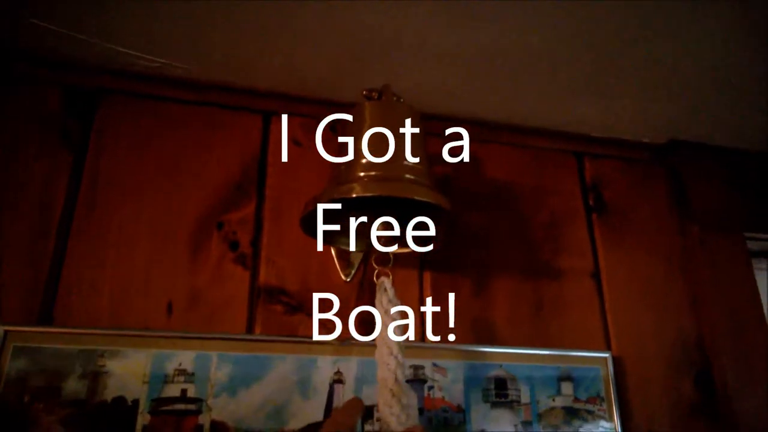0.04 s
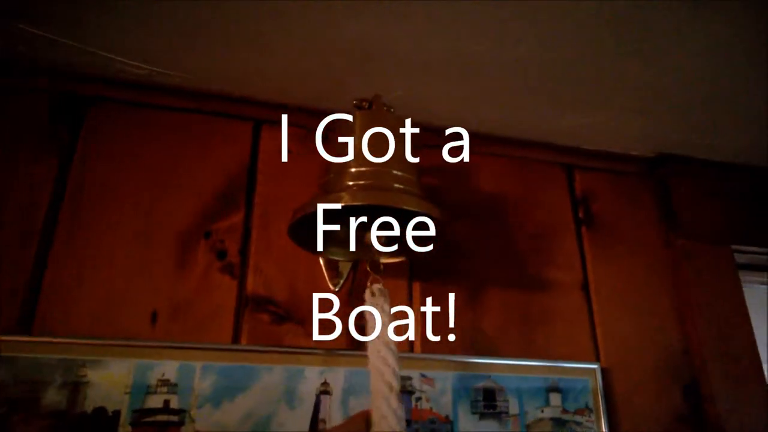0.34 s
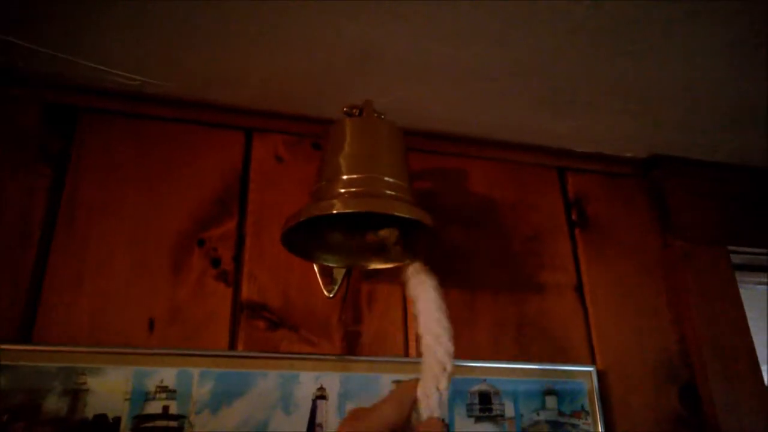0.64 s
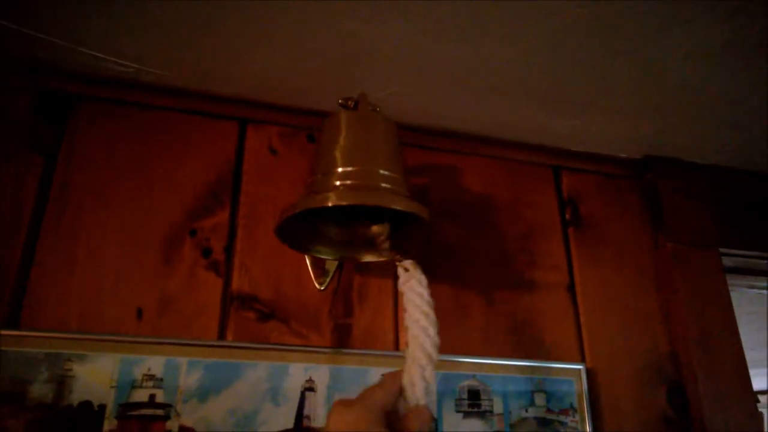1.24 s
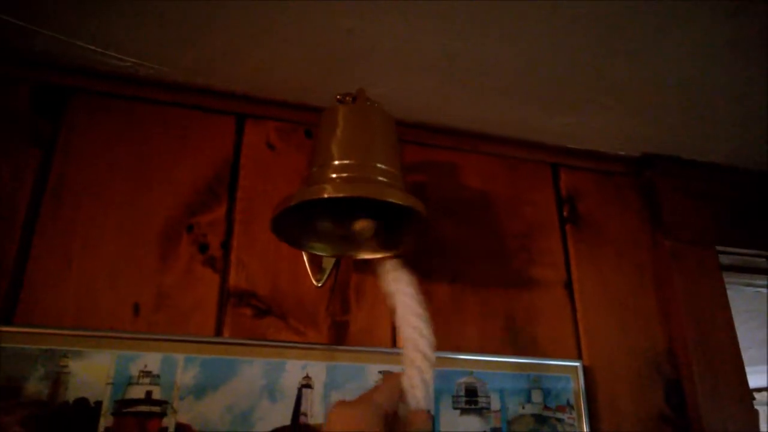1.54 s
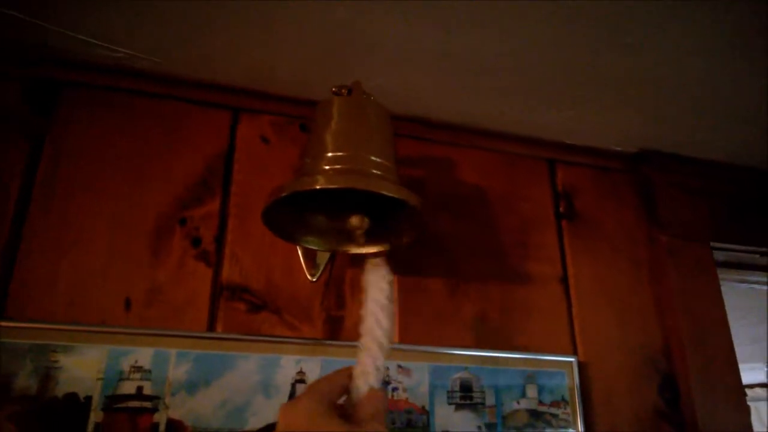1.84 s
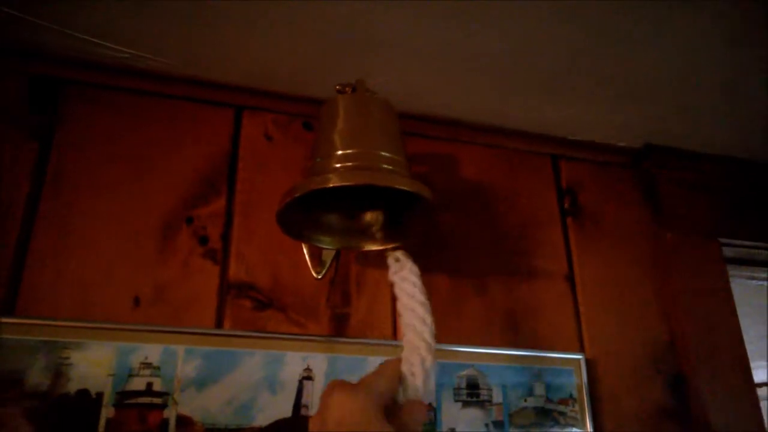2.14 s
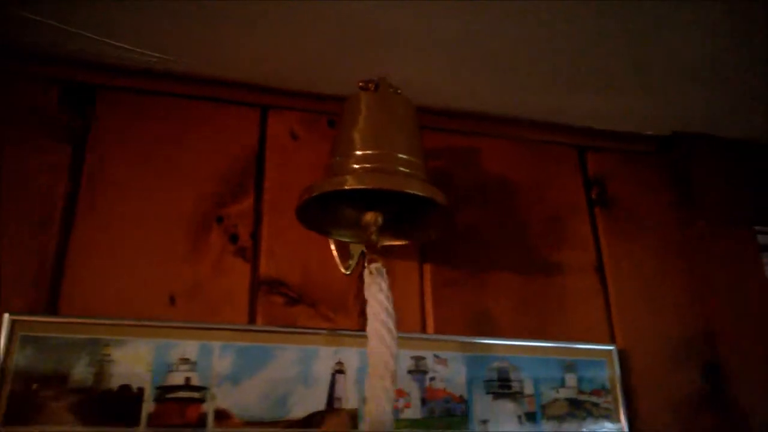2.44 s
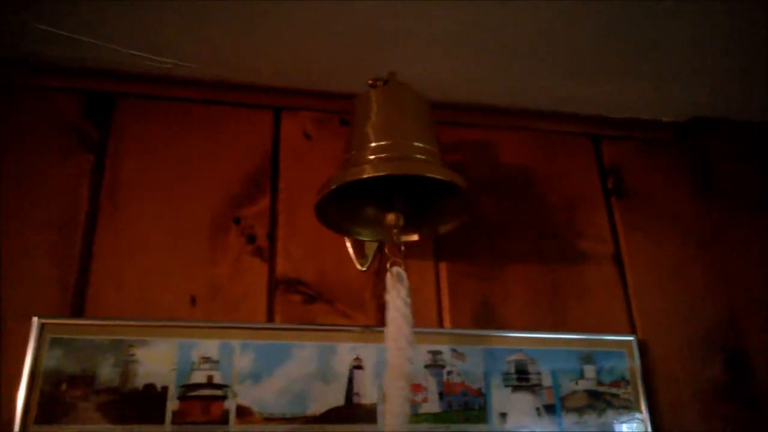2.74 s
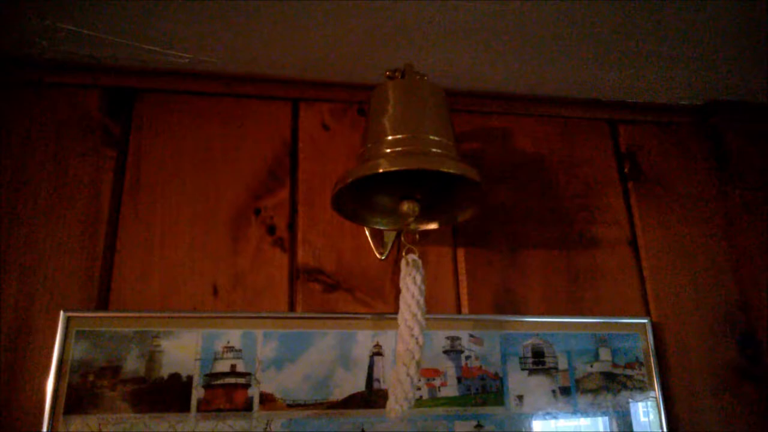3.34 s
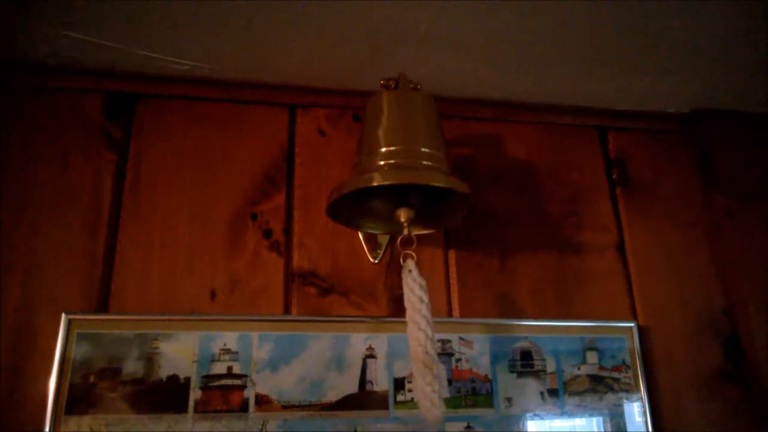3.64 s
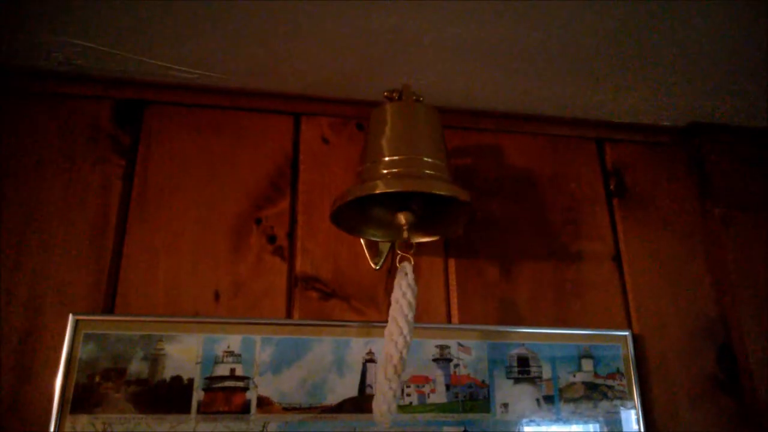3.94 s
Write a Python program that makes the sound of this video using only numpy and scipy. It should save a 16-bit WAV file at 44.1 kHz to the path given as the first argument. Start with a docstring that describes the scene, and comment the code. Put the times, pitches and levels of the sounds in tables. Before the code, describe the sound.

A small brass bell is struck four times with its rope and rings out.

```python
"""Brass bell in a quiet room

A small bell on a wooden wall, struck four times by its roped clapper, rings out on a stereo pair, its
partials beating in close pairs. Between blows the clapper's eye scrapes and the rope knocks. At the end
come a dry tick as the sound skips, a bump on the camera and another tick. The limiter ducks just ahead
of each blow and holds the ringing level until it has faded. Underneath lie a low rush and mains hum."""
import sys
import numpy as np
from scipy import signal
from scipy.fft import rfft, irfft
from scipy.io import wavfile
from scipy.ndimage import uniform_filter1d, minimum_filter1d

SR = 44100
rng = np.random.default_rng(int(sys.argv[2]) if len(sys.argv) > 2 else 0)


def materialize(psi):
    """Save the field psi as 16-bit PCM at rate SR to the path in sys.argv[1].

    A 1-D psi becomes a single channel; in a 2-D psi each row is a channel.
    """
    bounded = np.clip(np.atleast_2d(psi).T, -1, 1)
    quanta = np.round(bounded * 32767).astype(np.int16)
    wavfile.write(sys.argv[1], SR, quanta)


N = 176400
T = np.arange(N) / SR

# The clapper's blows. Each row: start in seconds, strength in dB, extra dB for the upper mode of the
# first (hum note), second and sixth pair, treble lift in dB, treble tilt in dB per octave.
BLOWS = [(0.6918, 12.5, 8, 4, 3.5, 0.5, -2.5), (1.1731, 0.5, 13, 8.5, 2, 3, -6.5),
         (1.612, 2, 11.5, -6, 4.5, 2.5, -0.5), (2.081, -3, 1.5, 2.5, -3, 5.5, -7)]


def from_db(db):
    """Decibels to gain."""
    return 10 ** (np.asarray(db) / 20)


def rms_one(x):
    """Scale to rms 1."""
    return x / np.sqrt(np.mean(x ** 2) + 1e-20)


def pan(db):
    """Left and right gains of constant power, the left louder by db."""
    return rms_one(from_db(np.array([[db], [-db]]) / 2))


def fade(age, t60):
    """Exponential decay, 60 dB down after t60 seconds, silent before age 0."""
    return (age >= 0) * np.exp(-np.log(1000) * np.clip(age / t60, 0, 4))


def decays(events, t60):
    """One decay per event, summed; each row begins with start in seconds and level in dB."""
    return sum(from_db(db) * fade(T - start, t60) for start, db, *_ in events)


def noise(spectrum, likeness=0.35):
    """Coloured stereo noise of rms 1; likeness is the correlation of left and right."""
    hz, db = np.transpose(spectrum)
    gain = from_db(np.interp(np.log(np.fft.rfftfreq(N, 1 / SR) + 1), np.log(hz), db))
    mid, side = irfft(rfft(rng.standard_normal((2, N))) * gain, N)
    return rms_one(np.sqrt(1 + likeness) * mid + np.sqrt(1 - likeness) * side * [[1], [-1]])


def resonate(x, hz, width_hz):
    """A two-pole resonance of peak gain 1."""
    r = np.exp(-np.pi * width_hz / SR)
    feedback = [1, -2 * r * np.cos(2 * np.pi * hz / SR), r * r]
    return signal.lfilter(np.array([1, 0, -1]) * (1 - r * r) / 2, feedback, x + 1e-18)


def mode(age, hz, pan_db, lead_rad):
    """One mode of the bell at the two microphones, the left ahead in phase by lead_rad."""
    angle = 2 * np.pi * (hz * age % 1) + np.array([[1], [-1]]) * lead_rad / 2
    return pan(pan_db) * np.sin(angle)


def bell():
    """Each blow sets all the modes of the brass going afresh; close neighbours beat as they die away."""
    # The strong pairs of modes. Each row: lower and upper frequency in Hz.
    pair_hz = [(889.5, 893.3), (2246.4, 2260.2), (2527.9, 2538.3), (2688.2, 2697.3), (3043.6, 3049.9),
               (4327, 4331), (5281.2, 5295)]
    # How those pairs ring. Each row: t60 in seconds, first swell in beat periods, then for lower and
    # upper mode in turn: levels in dB, left over right in dB, left leads in radians.
    pair_rings = [(26.3, 0.048, -30.5, -29.5, 8.5, -3.5, 3, 0.26),
                  (7.1, 0.59, -19.5, -21, 2, 3.5, 0.92, 1.74), (3.8, 1, -24, -19.5, 8.5, 10, -1.04, 4.5),
                  (1.637, 0.27, -2.5, -1.5, 4.5, 1, 1, 2.19), (3.09, 0.044, -8.5, -21, 5.5, -17, 0.1, -2),
                  (1.54, 0.99, -26, -15, -6, 10.5, 6.86, 1), (0.84, 0.35, -22, -24, 2, 4.5, 0.47, 1)]
    # The other modes. Each row: Hz, level in dB, t60 in seconds, left over right in dB.
    overtones = [(1794, -49.5, 3, -1), (4710, -8, 0.56, 7.5), (4785, -8.5, 0.75, 1.5),
                 (4786, -39.5, 2.73, -2), (5924, -18, .75, -3), (6016, -11, 0.48, 7),
                 (6970, -33, 0.38, 2.5), (7730, -25.5, 0.28, 4), (8320, -21, .3, -7.5), (8033, -15, .32, 3),
                 (8205, -17, .38, -1), (8854, -16, .37, 7), (9712, -25, .45, 7), (8690, -20, 0.33, 11.5),
                 (10185, -28, 0.26, -7), (10411, -21.5, 0.35, -3.5), (10720, -31.5, .48, -2),
                 (11300, -25.5, .38, 5), (11138, -26.5, 0.27, 8.5), (11835, -24, 0.32, -11),
                 (12950, -37.5, .45, 4.5), (13573, -19, .32, 0), (13950, -34, .3, 2.5),
                 (15030, -32.5, .33, -0.5), (15750, -34.5, .35, 1), (13754, -70, 4, 3)]
    # The hum note's lower mode shifts between the microphones. Each row: seconds, extra lead in radians.
    hum_shift = [(3.1, 0), (3.6, -1.8)]
    treble_hz, twin_db, twin_split_hz = 4500, -9.5, 10
    build_db, build_s = -1, 0.09
    starts, strength_db, hum_db, second_db, sixth_db, treble_db, tilt_db = np.transpose(BLOWS)
    latest = np.maximum(np.searchsorted(starts, T, "right") - 1, 0)
    age = T - starts[latest] + 0.021 * (T > 3.3865)   # the ringing skips ahead at the first tick

    def envelope(hz, t60):
        """A mode's level since the latest blow, which has its own brightness."""
        colour_db = (hz > treble_hz) * (treble_db + tilt_db * np.log2(hz / treble_hz))
        return from_db(strength_db + colour_db)[latest] * fade(age, t60)

    out = np.zeros((2, N))
    even = np.zeros(len(starts))
    answers_db = (hum_db, second_db, even, even, even, sixth_db, even)
    for (low_hz, high_hz), ring, answer_db in zip(pair_hz, pair_rings, answers_db):
        t60, swell, low_db, high_db, low_pan, high_pan, low_lead, high_lead = ring
        if low_hz == pair_hz[0][0]:
            low_lead = low_lead + np.interp(T, *np.transpose(hum_shift))
        lower = from_db(low_db) * mode(age, low_hz, low_pan, low_lead)
        upper = mode(age - swell / high_hz, high_hz, high_pan, high_lead)
        out += envelope(low_hz, t60) * (lower + from_db(high_db + answer_db)[latest] * upper)
    for hz, db, t60, pan_db in overtones:
        lead, twin_lead, detune = rng.uniform(-1.044, 1, 3)
        main = mode(age, hz, pan_db, lead_rad=3.73 * lead)
        twin = mode(age, hz + twin_split_hz * (1 + detune / 2), pan_db, lead_rad=np.pi * twin_lead)
        out += from_db(db) * envelope(hz, t60) * (main + from_db(twin_db) * twin)
    # The ringing fills the room just after a blow.
    return out * from_db(build_db * np.exp(-np.maximum(age, 0) / build_s))


def clank():
    """The crack of metal on metal at each blow, and its dull tail in the room."""
    # The colours of the contact and of the room's answer. Each row: Hz, relative level in dB.
    contact_colour = [(100, -4.5), (500, -13.5), (1000, -5.5), (1800, -14.5), (3500, -15.5), (4800, 17.5),
                      (7000, -29), (10000, -29.5), (16000, -19.5)]
    room_colour = [(100, -3.5), (500, -6.5), (1000, 5.5), (1800, -10.5), (3500, -15), (5000, -14.5),
                   (7000, -24), (16000, -33.5)]
    crack = from_db(7.5) * decays(BLOWS, t60=0.018) * noise(contact_colour)
    tail = from_db(-25) * decays(BLOWS, t60=0.28) * noise(room_colour)
    return crack + tail


def clapper_scrapes():
    """The clapper's eye slips and catches in its hanger, rasping and making the clapper ring faintly."""
    # Scrapes that swell and fade. Each row: middle in seconds, half length in seconds, level in dB.
    scrapes = [(.585, 0.043, -53.5), (1.565, 0.048, -44.5), (1.93, 0.029, -53), (2.02, 0.045, -54)]
    # The eye catches with a clink. Each row: start in seconds, level in dB.
    clinks = [(0.5455, -62), (0.5535, -62.5), (0.5841, -45), (1.532, -36.5), (1.565, -43.5), (1.905, -51),
              (1.945, -60), (2.001, -46.5), (3.252, -63.5), (3.532, -64.5)]
    # The colour of the rasp. Each row: Hz, relative level in dB.
    rasp_colour = [(200, 2), (700, 10), (1500, -9), (2500, -14), (4000, -2.5), (7000, -8.5), (10000, -16.5),
                   (14500, -17), (16000, -17.5)]
    # The clapper's own modes. Each row: Hz, relative level in dB, t60 in seconds.
    clapper_modes = [(4900, -8.5, 0.35), (6100, -4, 0.22), (8060, 2.5, 0.27), (10960, -5.5, 0.23),
                     (12200, -8.5, 0.2), (14700, -8, 0.18)]
    slips_per_s, slip_spread_db, ring_db = 54, 7, -3
    slip = np.cumsum(rng.random(N) < slips_per_s / SR)
    grain = rms_one(from_db(slip_spread_db * rng.standard_normal(N))[slip])
    swells = sum(from_db(db) * np.exp(-((T - middle) / half) ** 2) for middle, half, db in scrapes)
    rub = grain * swells + decays(clinks, t60=0.033)
    friction = rub * rng.standard_normal((2, N))
    ring = np.zeros((2, N))
    for hz, db, t60 in clapper_modes:
        damping = np.log(1000) / t60
        ring += from_db(db) * resonate(friction, hz, damping / np.pi) * np.sqrt(SR / damping)
    return pan(db=2.5) * (rub * noise(rasp_colour) + from_db(ring_db) * ring)


def rope_knocks():
    """Working the rope gives soft, hollow knocks: bursts of noise through one resonance."""
    # The knocks. Each row: start in seconds, level in dB.
    knocks = [(0.932, -28), (.968, -20.5), (1.07, -24), (1.118, -26.5), (1.414, -29), (1.533, -24.5),
              (1.824, -34), (1.85, -30.5), (1.948, -36), (2.003, -31.5), (2.372, -41), (2.852, -49),
              (2.985, -44)]
    hz, width_hz = 959, 120
    push = rng.standard_normal(N) * decays(knocks, t60=0.14)
    hollow = resonate(resonate(push, hz, width_hz), hz, 2 * width_hz)
    return hollow * np.sqrt(SR / (2 * width_hz))


def mount_thuds():
    """The wooden mount thuds under the pull, one low damped tone each time."""
    # The thuds. Each row: start in seconds, pitch in Hz, level in dB.
    thuds = [(1.408, 309, -30.5), (2.291, 453, -51)]
    rise_s = 0.0043
    out = np.zeros(N)
    for start, hz, db in thuds:
        age = T - start
        envelope = np.clip(age / rise_s, 0, 1) * fade(age, t60=0.16)
        out += from_db(db) * envelope * np.sin(2 * np.pi * hz * age)
    return out


def ticks_and_camera_bump():
    """A dry tick, a thump of the bumped camera body in the right microphone, then a second tick."""
    # The ticks. Each row: start in seconds, level in dB.
    ticks = [(3.387, -33), (3.949, -34.5)]
    # Their colour. Each row: Hz, relative level in dB.
    tick_colour = [(150, 1), (900, 4.5), (1600, -5), (2800, -17), (5000, -27.5), (15000, -53)]
    # The modes of the camera body. Each row: Hz, level in dB, t60 in seconds.
    body_modes = [(27, -24, 0.37), (104.7, -19, 0.031), (243, -26.5, 0.0174), (575, -21, 0.0084),
                  (1180, -69, 0.0083), (4750, -44, 0.0084)]
    bump_s = 3.8415
    ticking = noise(tick_colour, likeness=0.85) * decays(ticks, t60=0.018)
    age = T - bump_s
    thump = sum(from_db(db) * fade(age, t60) * np.sin(2 * np.pi * hz * age) for hz, db, t60 in body_modes)
    return ticking + pan(db=-23.5) * thump


def room_tone():
    """A low steady rush with a little mains hum."""
    # The colour of the rush. Each row: Hz, relative level in dB.
    rush_colour = [(15, -36.5), (25, -12), (114, -11), (145, -21.5), (263, -20.5), (463, -26.5), (545, -31),
                   (591, -29), (6380, -62.5), (16000, -60.5)]
    # The mains hum and its octave. Each row: Hz, level in dB.
    mains = [(59.5, -57.5), (119, -59.5)]
    hum = sum(from_db(db) * np.sin(2 * np.pi * (hz * T + rng.random())) for hz, db in mains)
    return from_db(-57) * noise(rush_colour, likeness=0.85) + hum


def scene():
    """The bell with its clapper, rope and mount, then a tick, a bump on the camera and another tick."""
    return bell() + clank() + clapper_scrapes() + rope_knocks() + mount_thuds() + ticks_and_camera_bump()


def reduction(power, limit_db, release_db_per_s):
    """Decibels by which the level exceeds a limit, let go at a steady rate."""
    over_db = np.maximum(10 * np.log10(np.maximum(power, 1e-12)) - limit_db, 0)
    return np.maximum.accumulate(over_db + release_db_per_s * T) - release_db_per_s * T


def record(dry):
    """The recorder: slow gain control and a fast limiter, both looking ahead; room tone; a top cut."""
    sense_s, look_ahead_s, cutoff_hz = 0.12, 0.0065, 17000
    power = np.mean(dry ** 2, axis=0)
    pole = np.exp(-1 / (sense_s * SR))
    slow_power = signal.lfilter([1 - pole], [1, -pole], power)
    slow_db = reduction(slow_power, limit_db=-12.5, release_db_per_s=18.5)
    fast_db = reduction(uniform_filter1d(power, size=64), limit_db=-14, release_db_per_s=300)
    half = int(look_ahead_s * SR / 2)
    gain_db = minimum_filter1d(-np.maximum(slow_db, fast_db), 2 * half + 1, origin=-half)
    smooth_db = uniform_filter1d(uniform_filter1d(gain_db, size=128), size=96)
    top_cut = signal.cheby2(12, 70, cutoff_hz, fs=SR, output="sos")
    return signal.sosfilt(top_cut, dry * from_db(smooth_db) + room_tone())


dry = scene()
out = record(dry)
materialize(out)
```